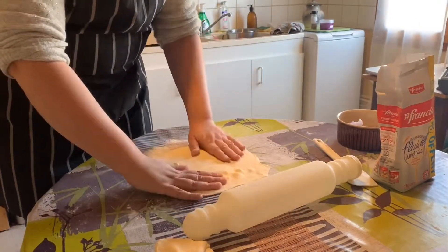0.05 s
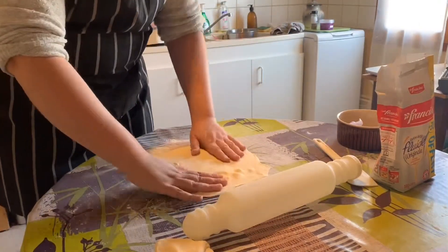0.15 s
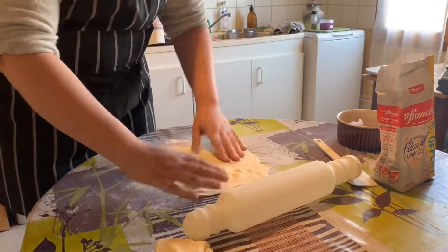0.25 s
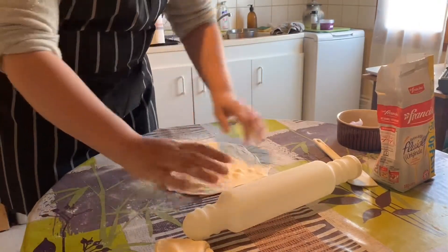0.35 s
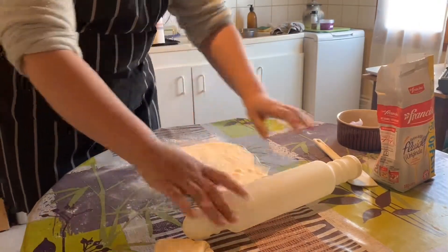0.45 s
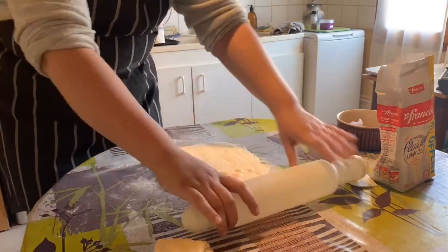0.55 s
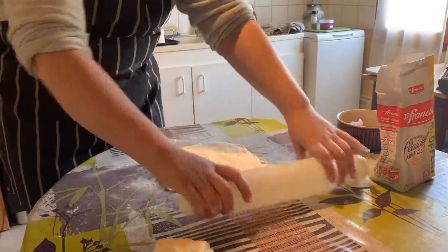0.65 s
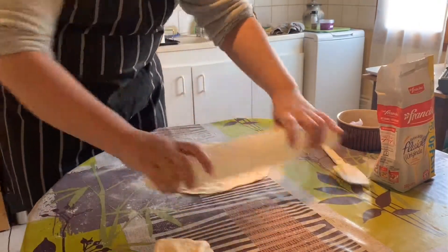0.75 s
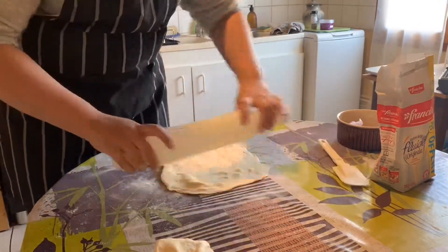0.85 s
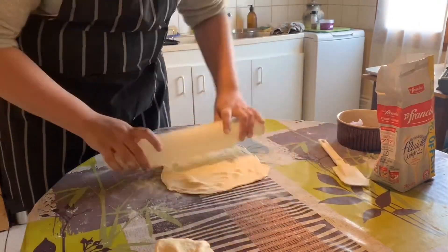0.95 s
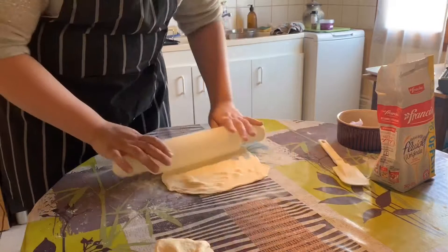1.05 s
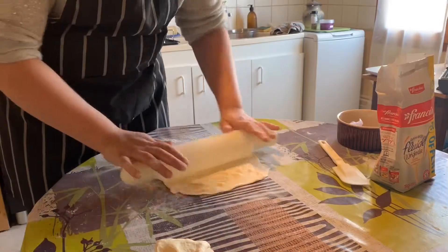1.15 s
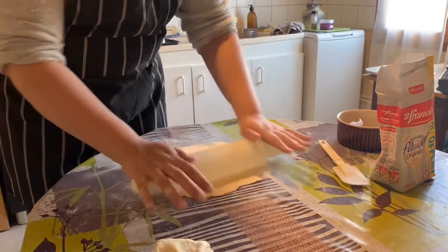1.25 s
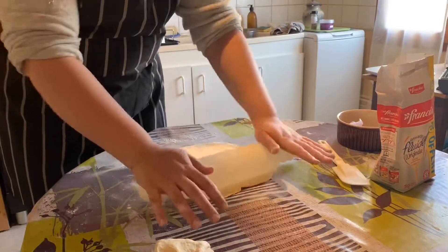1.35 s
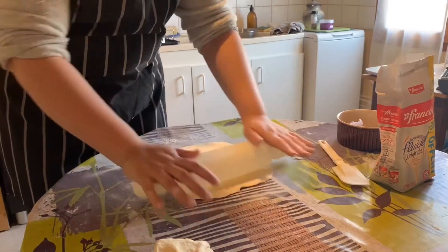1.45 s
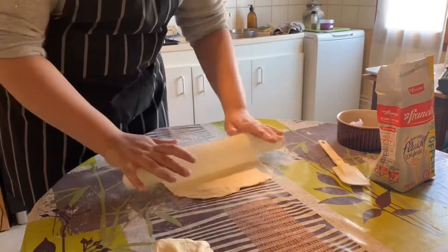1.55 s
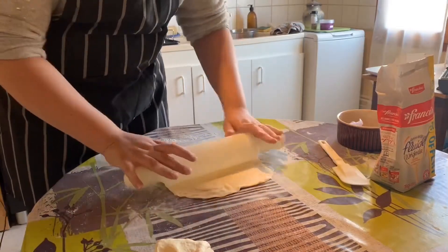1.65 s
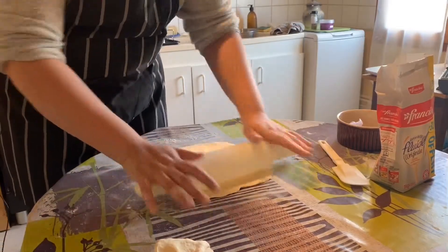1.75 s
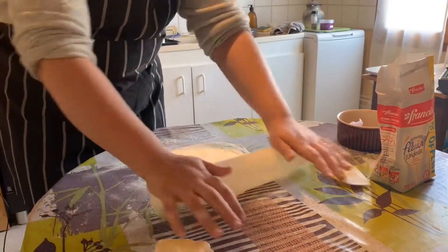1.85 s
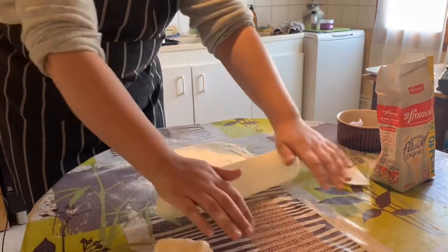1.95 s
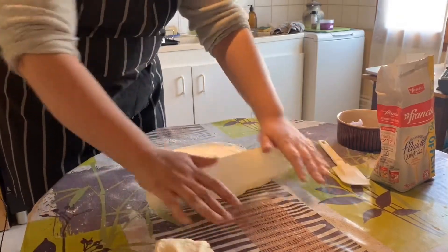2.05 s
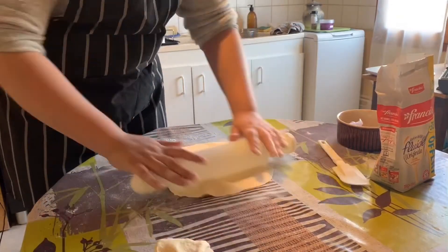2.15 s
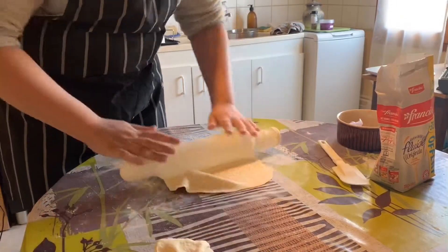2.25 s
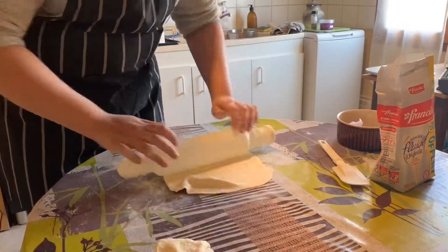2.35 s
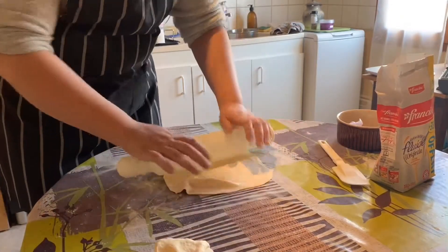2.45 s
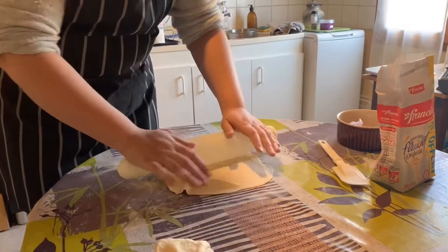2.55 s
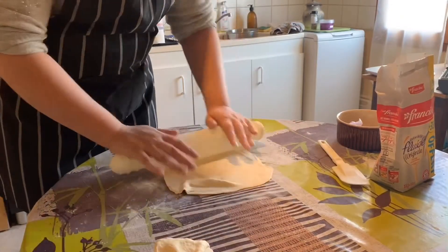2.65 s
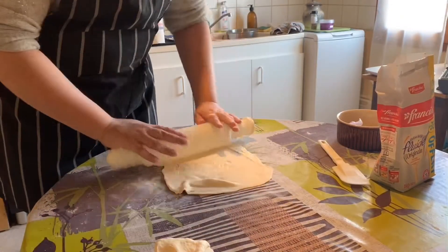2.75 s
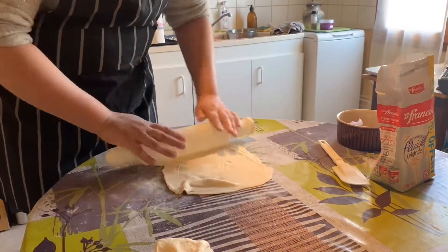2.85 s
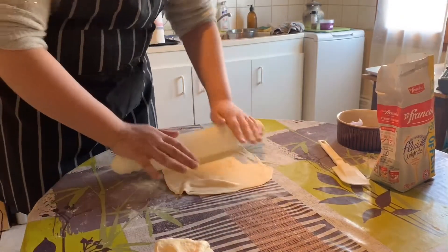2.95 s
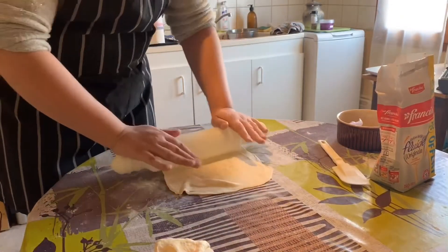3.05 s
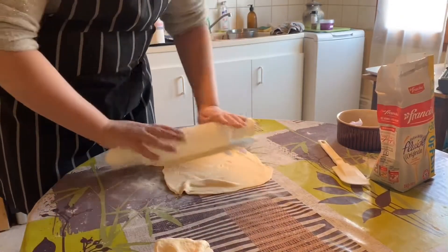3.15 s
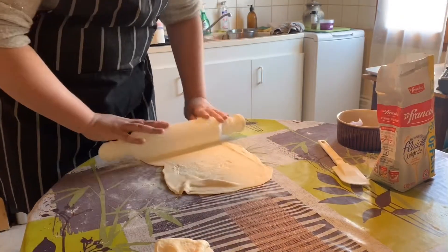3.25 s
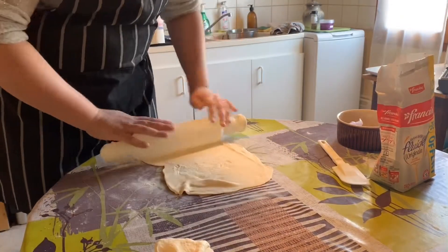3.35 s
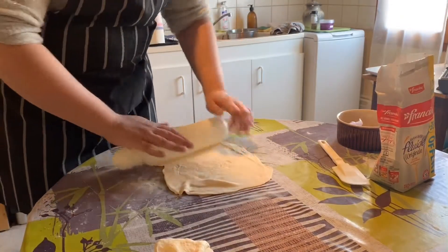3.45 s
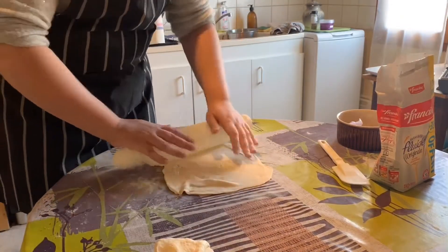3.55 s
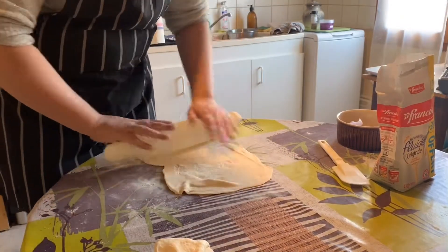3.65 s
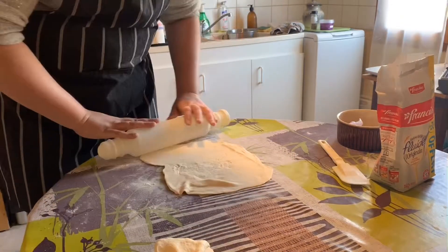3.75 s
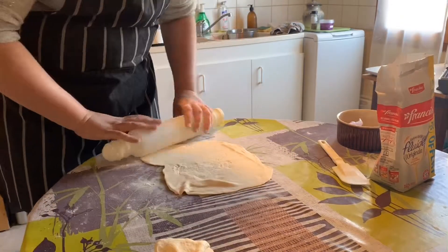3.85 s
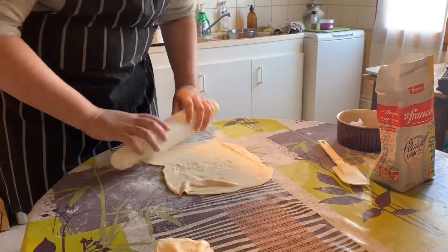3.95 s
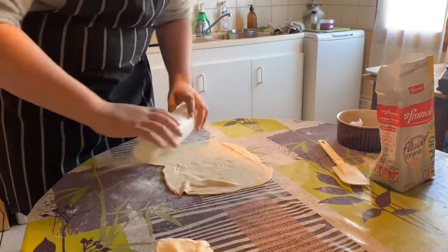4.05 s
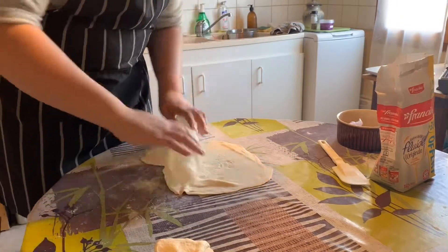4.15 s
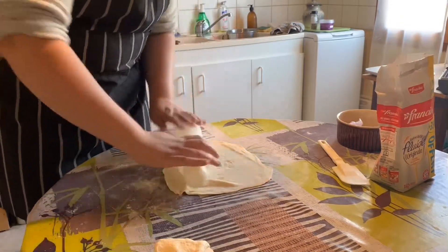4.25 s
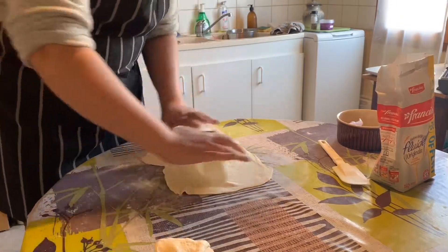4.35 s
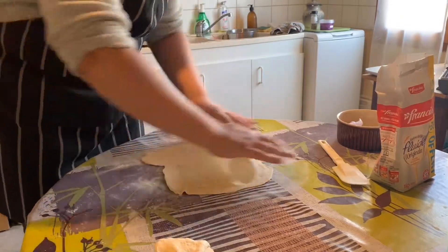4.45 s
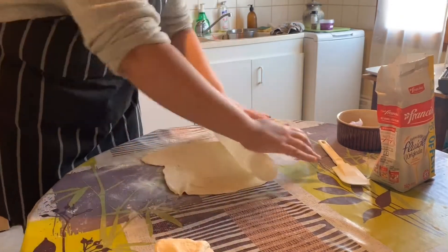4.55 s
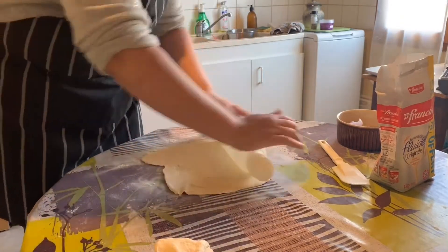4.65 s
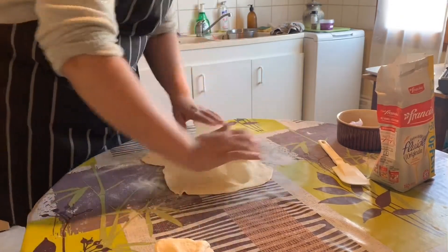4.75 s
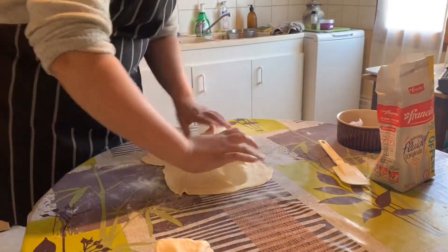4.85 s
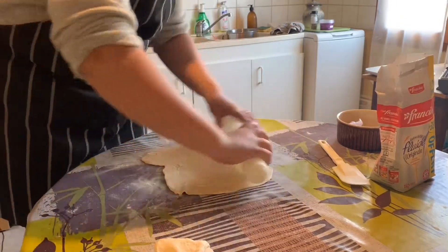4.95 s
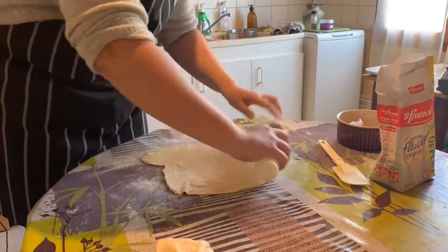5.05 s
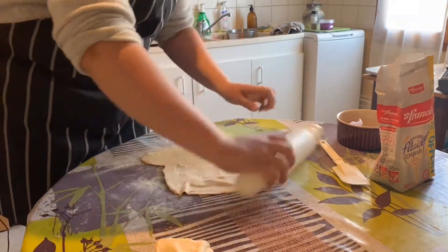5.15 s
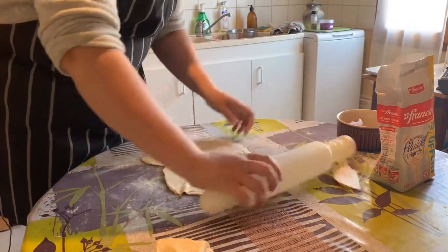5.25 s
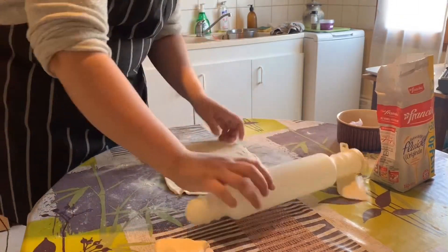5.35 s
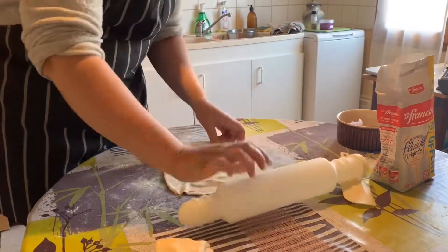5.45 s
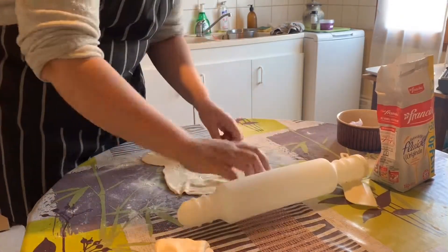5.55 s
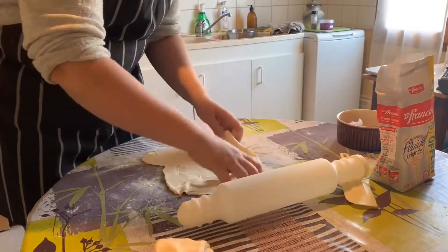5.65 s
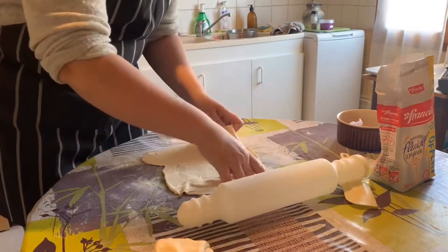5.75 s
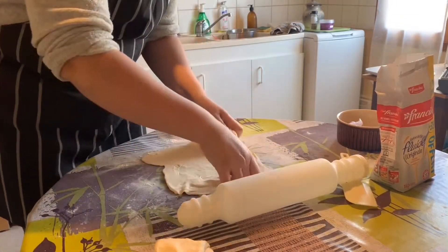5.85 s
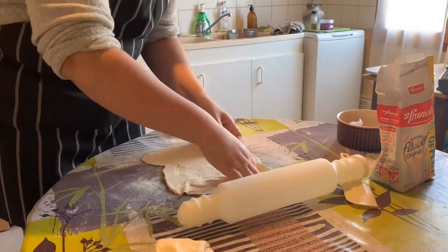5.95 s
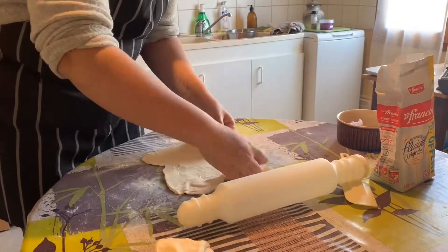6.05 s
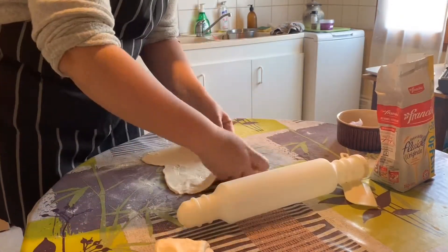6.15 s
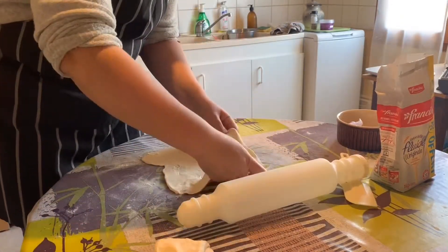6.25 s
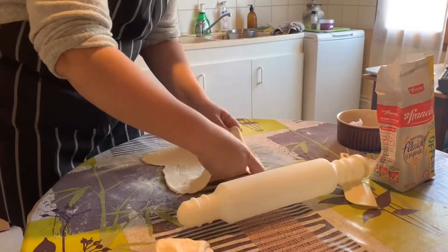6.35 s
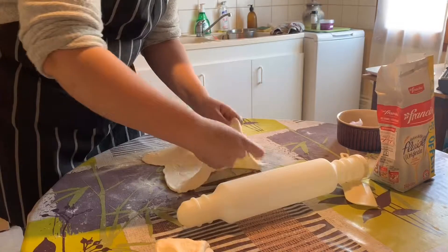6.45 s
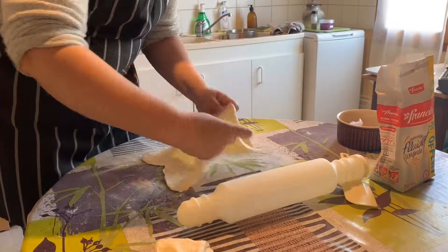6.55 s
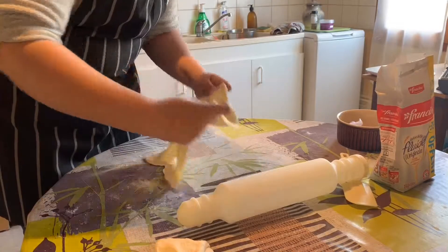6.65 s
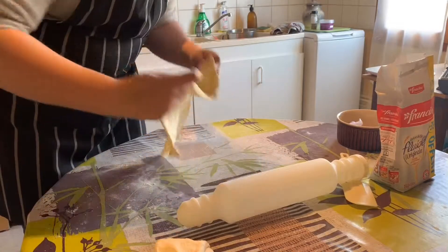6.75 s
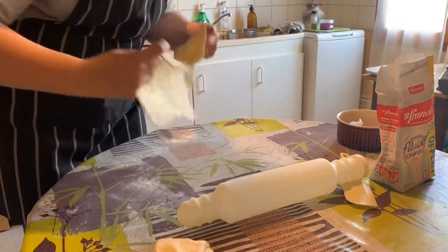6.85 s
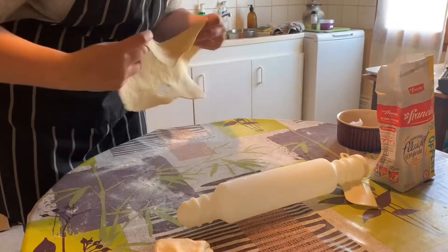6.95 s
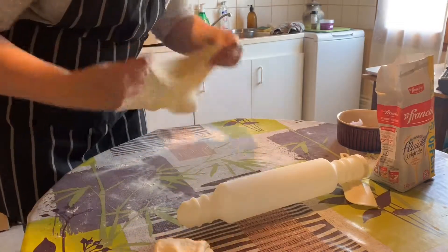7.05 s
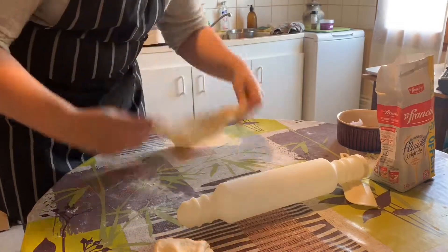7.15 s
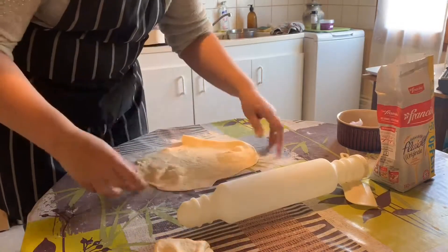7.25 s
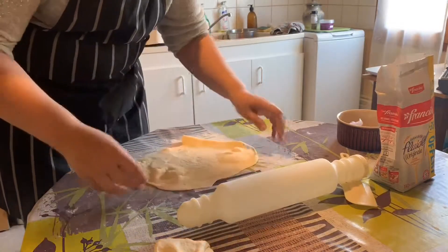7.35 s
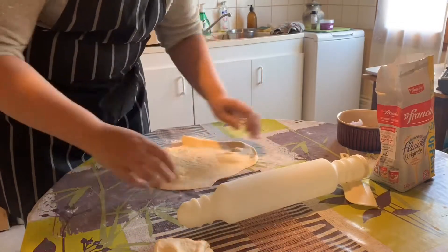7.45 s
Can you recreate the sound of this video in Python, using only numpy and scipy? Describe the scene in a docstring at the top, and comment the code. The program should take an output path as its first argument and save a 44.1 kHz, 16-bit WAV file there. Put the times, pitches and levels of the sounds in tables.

```python
"""Rolling out dough in a small kitchen

Dough is rolled out by hand on a floured oilcloth, heard close by; a faint appliance hums.
Palms brush dough and pin as noise that swells with the hand's speed; the pin rumbles as grainy noise.
Thumps, wood knocks, ticks and slaps are short decaying tones and noise; the pin clatters as it is laid aside.
The sheet is peeled off with a narrow hiss, turned over and slapped down; the room answers with a short tail."""
import sys
import numpy as np
from scipy import signal
from scipy.io import wavfile

SR = 44100
rng = np.random.default_rng(int(sys.argv[2]) if len(sys.argv) > 2 else 0)


def inscribe(sig):
    """Save sig as 16-bit PCM at rate SR to the path in sys.argv[1].

    A 1-D sig is mono; a 2-D sig holds one channel per row.
    Samples are clipped to [-1, 1] before scaling.
    """
    pcm = np.round(np.clip(np.atleast_2d(sig).T, -1, 1) * 32767)
    wavfile.write(sys.argv[1], SR, pcm.astype(np.int16))


N = 331191
TIME = np.arange(N) / SR
AGE = np.arange(SR // 2) / SR  # seconds since a blow

# Modes of the wooden rolling pin. Each row: frequency in Hz, level in dB, t60 in seconds.
PIN_MODES = [(532, -3.5, 0.036), (1032, -7, 0.037), (1715, -10, 0.075), (2583, -4, 0.039),
             (4270, -2.5, .03), (4820, -7.5, 0.055), (6600, -13.5, 0.025)]


def amp(db):
    """Decibels to gain."""
    return 10 ** (np.asarray(db) / 20)


def unit(x):
    """Scales to rms 1."""
    return x / np.sqrt(np.mean(x ** 2) + 1e-20)


def peaked(x, db):
    """Scales to a peak level in dB."""
    return amp(db) * x / abs(x).max()


def read(points, hz):
    """Reads a table on a log-frequency axis."""
    f, value = np.transpose(points)
    return np.interp(np.log(hz + 1), np.log(f), value)


def add(mix, s, sound):
    """Mixes a sound in at time s, in place."""
    part = mix[max(round(s * SR), 0):][:len(sound)]
    part += sound[:len(part)]


def colour(x, gain, size=8192):
    """Minimum-phase filter whose magnitude is gain(Hz)."""
    hz = abs(np.fft.fftfreq(size, 1 / SR)) + 1
    log_gain = np.log(np.maximum(gain(hz), 1e-5))
    response = np.exp(np.conj(signal.hilbert(log_gain)))
    taps = np.fft.ifft(response).real[:size // 2]
    return signal.oaconvolve(x, taps)[:len(x)]


def bump(f, centre, q):
    """Magnitude of one resonance."""
    return 1 / np.sqrt(1 + (q * (f / centre - centre / f)) ** 2)


def shaped(x, spectrum):
    """Gives x a spectrum, at rms 1."""
    return unit(colour(x, lambda f: amp(read(spectrum, f))))


def dying(t60):
    """Exponential decay by 60 dB in t60 seconds."""
    return np.exp(-np.log(1000) * AGE / t60)


def tone(hz):
    """A steady sine starting at the blow."""
    return np.sin(2 * np.pi * hz * AGE)


def ring(modes):
    """Impulse response of a struck body: a sum of decaying sines."""
    return sum(amp(db) * dying(t60) * tone(hz) for hz, db, t60 in modes)


def burst(t60):
    """A dying puff of noise: many small contacts or dense modes."""
    return rng.standard_normal(len(AGE)) * dying(t60)


def wander(per_s):
    """Random drift of rms 1 through per_s new values a second."""
    return unit(np.interp(TIME * per_s, np.arange(N), rng.standard_normal(N)))


def grains(per_s, spread_db):
    """Random tiny impacts of uneven size, at rms 1."""
    size = amp(spread_db * np.minimum(rng.exponential(1, N), 4))
    happens = rng.random(N) < per_s / SR
    return unit(size * rng.standard_normal(N) * happens)


def speed(fastest_s, rise_s, fall_s):
    """A hand speeds up, passes its top speed of 1 and slows down."""
    shape = 1.45  # roundness of the swell: 1 pointed, 2 a bell
    t = TIME - fastest_s
    distance = np.minimum(np.maximum(-t / rise_s, t / fall_s), 10)
    return np.exp(-distance ** shape)


def sustained(start_s, length_s, attack_s, release_s):
    """Linear attack, hold and an exponential release."""
    t = TIME - start_s
    attack = np.clip(t / attack_s, 0, 1)
    return attack * np.exp(-np.clip((t - length_s) / release_s, 0, 20))


def room_tone():
    """Still air as shaped noise, and a faint appliance hum whose phase wavers."""
    # Kitchen appliance. Each row: frequency in Hz, rms level in dB.
    hum_tones = [(592, -73), (1330, -87)]
    # Spectrum of the still room. Each row: frequency in Hz, relative level in dB.
    quiet_spectrum = [(25, -26), (42, -15.5), (60, 4.5), (110, -13), (200, -17), (400, -15), (620, -10),
                      (850, -24), (1400, -21), (3500, -20.5), (7000, -32.5), (14000, -34), (15800, -37.5)]
    quiet_db = -69
    hum = np.zeros(N)
    for hz, db in hum_tones:
        phase = 2 * np.pi * hz * TIME + 0.5 * wander(per_s=7.8)
        hum += amp(db) * unit(np.sin(phase))
    return hum + amp(quiet_db) * shaped(rng.standard_normal(N), quiet_spectrum)


def rubbing():
    """Micro-slips of skin on flour and cloth hiss and drag with the hand's speed; drag faintly rings the pin."""
    # Strokes of skin, sleeve and dough over pin and cloth. Each row: fastest moment in seconds,
    # speeding up in seconds, slowing down in seconds, bright hiss in dB, dull drag in dB.
    strokes = [(0.0, .02, 0.035, -61, -65), (.1, 0.018, 0.033, -76, -51), (.25, 0.14, 0.032, -74, -63),
               (.505, 0.0067, 0.048, -49.5, -52.5), (0.593, 0.04, 0.081, -41.5, -51),
               (.81, 0.055, 0.054, -50.5, -56), (1.022, 0.023, 0.032, -46.5, -50),
               (1.123, 0.049, 0.081, -46.5, -52), (1.37, 0.1, 0.044, -58, -57.5),
               (1.489, 0.02, 0.052, -56.5, -54.5), (1.59, 0.034, 0.045, -51.5, -57),
               (1.86, 0.13, 0.06, -60, -56.5), (1.995, 0.046, 0.03, -53.5, -57.5),
               (2.215, 0.059, 0.14, -52.5, -52), (2.375, 0.048, 0.036, -45, -52),
               (2.509, 0.013, 0.02, -56, -59), (2.75, 0.18, 0.077, -61, -59),
               (2.938, .02, 0.032, -56, -63.5), (3.03, 0.063, 0.057, -67, -62),
               (3.16, 0.028, 0.04, -54, -55), (3.238, 0.039, 0.056, -50.5, -53),
               (3.428, .026, 0.064, -48.5, -52.5), (3.76, 0.12, 0.096, -55, -54.5),
               (3.92, 0.081, 0.084, -45, -49), (4.104, 0.052, 0.12, -44.5, -55.5),
               (4.322, .06, 0.088, -48.5, -59), (4.49, 0.027, 0.036, -57, -57),
               (4.57, 0.03, .025, -51, -54.5), (4.784, 0.076, 0.055, -48.5, -53),
               (5.011, 0.095, 0.17, -44, -54.5), (5.15, 0.11, 0.31, -44, -53.5),
               (5.42, 0.055, 0.12, -47.5, -51), (5.639, 0.072, 0.13, -52.5, -58),
               (5.779, 0.047, 0.064, -53.5, -51), (6.08, 0.45, 0.062, -64.5, -63),
               (6.26, 0.06, 0.043, -74.5, -62.5), (6.599, 0.13, 0.14, -66.5, -60),
               (6.789, 0.063, 0.03, -63, -64.5), (6.93, 0.089, 0.1, -80.5, -67.5),
               (7.185, 0.013, .045, -74.5, -56), (7.294, 0.022, 0.051, -59, -38)]
    # Spectra of hiss and drag. Each row: frequency in Hz, relative level in dB.
    hiss_spectrum = [(1800, -35), (2900, -15), (3700, -9.5), (5000, -5.5), (7000, -5), (8500, -9),
                     (11000, -10.5), (14000, -10.5), (15800, -9.5)]
    drag_spectrum = [(450, 2), (800, -4), (1080, 1), (1400, 1.5), (1720, 1.5), (2100, -3), (2650, -1),
                     (3100, -3), (4000, -1), (5500, -6.5), (8000, -19.5), (16000, -29.5)]
    drag_exponent = 0.75  # drag grows as this power of the speed, so it outlasts the hiss
    hiss_power, drag_power = np.zeros((2, N))
    for s, rise_s, fall_s, hiss_db, drag_db in strokes:
        pace = speed(s, rise_s, fall_s)
        hiss_power += (amp(hiss_db) * pace) ** 2
        drag_power += (amp(drag_db) * pace ** drag_exponent) ** 2
    hiss = shaped(grains(per_s=18000, spread_db=-0.8), hiss_spectrum) * np.sqrt(hiss_power)

    slips = grains(per_s=4000, spread_db=-2.5)
    rung_pin = signal.oaconvolve(slips, ring(PIN_MODES))[:N]
    singing = unit(colour(rung_pin, lambda f: bump(f, 1500, q=0.99)))
    held = np.interp(TIME, [0.5, 0.6, 5.3, 5.45], [0, 1, 1, 0])  # the hands are on the pin
    dull = shaped(grains(per_s=4400, spread_db=-1.0), drag_spectrum)
    drag = (dull + amp(-6.5) * held * singing) * np.sqrt(drag_power)

    direct = (hiss + drag) * amp(wander(per_s=79))  # flickers by 1 dB rms
    # the bounce off the table top shifts as the hands move
    lag_s = 0.001115 + 0.0003 * wander(per_s=5)
    return direct + amp(-7) * np.interp(TIME - lag_s, TIME, direct)


def slaps():
    """Flat surfaces meet: the trapped air pops and a bright splash escapes at the rim."""
    # Flat pats of palm and dough. Each row: start in seconds, peak in dB, trapped air in Hz,
    # splash in dB relative to the pop.
    pats = [(.059, -38, 1090, -12), (.066, -34, 1515, 2), (.079, -32, 886, -9), (7.224, -38.5, 760, -2),
            (7.256, -21.5, 490, 7), (7.2639, -18.5, 710, 0), (7.271, -8, 785, -2)]
    out = np.zeros(N)
    for s, db, hz, splash_db in pats:
        air = ring([(hz * 0.86, -4, 0.045), (hz, -3, 0.03), (hz * 1.3, -2, 0.045)])
        pop = colour(air + amp(8.5) * burst(0.065), lambda f: bump(f, hz, q=1.46) ** 2)
        spray = burst(0.023) + amp(-12.0) * burst(0.23)
        splash = colour(spray, lambda f: bump(f, 2880, q=0.72))
        add(out, s, peaked(peaked(pop, 0) + peaked(splash, splash_db), db))
    return out


def thumps():
    """A padded blow sounds its spot and the whole top; longer contact swells slower and rings duller."""
    # Hands, pin and dough landing on the table top. Each row: start in seconds, peak in dB,
    # pitch favoured by the spot in Hz, contact time in ms, sag of the whole top in dB.
    blows = [(.064, -28.5, 230, 1.4, 23), (0.488, -26.5, 143, 3.65, -8), (0.626, -24, 227, 1.9, 2.5),
             (0.776, -31.5, 315, 3.7, 11), (0.926, -36.5, 250, 3.6, 8), (1.027, -18.5, 289, 2.15, 2),
             (1.032, -22, 126, 7.3, -6), (1.344, -45, 303, 1.7, 6), (1.589, -44, 345, 0.78, -20),
             (2.009, -47, 130, 3.8, -2), (2.728, -48, 352, 2.9, -20), (3.017, -44, 138, 1.7, 22),
             (3.597, -26, 160, 2, 26), (3.74, -21, 370, 0.28, -10.5), (4.2145, -6.5, 290, 1.43, -1.5),
             (4.782, -23, 290, 3.47, 0.5), (5.066, -15, 315, 0.65, -21.5), (5.182, -25.5, 344, 3.1, -11.5),
             (5.246, -15.5, 388, 1.7, 1), (5.292, -17, 428, 1.5, -1.5), (5.358, -19, 394, 1.3, 2.5),
             (5.648, -25, 441, 2, -5.5), (5.877, -38.5, 214, 1.6, 15), (6.016, -35, 432, 0.45, 2),
             (6.236, -40.5, 326, 1.8, 2), (7.253, -22.5, 334, 1.2, 10)]
    # Modes of the table top. Each row: frequency in Hz, level in dB, t60 in seconds.
    table_modes = [(58.2, -30.5, 0.45), (70, -19, 0.11), (79.5, -20.5, 0.28), (134.4, -14.5, 0.12),
                   (149, -23, 0.29), (193, -15.5, 0.18), (282, -11, 0.096), (308.7, -15, 0.08),
                   (329.6, -27.5, 0.22), (361, -32.5, 0.43), (428, -32, 0.34), (484, -26.5, 0.2),
                   (570.3, -17.5, 0.099), (594, -21.5, 0.37), (644.5, -21, 0.29), (740, -17, 0.2),
                   (890, -22.5, .12)]
    out, top = np.zeros(N), ring(table_modes)
    for s, db, hz, contact_ms, sag_db in blows:
        limit_hz = 1000 / contact_ms

        def force(f):
            favoured = bump(f, hz, q=1.9) + amp(sag_db) * bump(f, 62, q=1.3)
            return favoured / np.sqrt(1 + (f / limit_hz) ** 7)

        spot = amp(-18.0) * dying(0.075) * tone(hz)
        swell = 1 - np.exp(-AGE * limit_hz / 1.1)
        struck = (spot + top + amp(-19.5) * burst(0.072)) * swell
        add(out, s, peaked(colour(struck, force), db))
    return out


def ticks():
    """Tiny contacts, each a very short ring with a trace of noise at its pitch."""
    # Fingernails and small sticky snaps. Each row: start in seconds, peak in dB, pitch in Hz,
    # ring t60 in seconds.
    contacts = [(0.487, -32.5, 6600, 0.00063), (1.108, -28, 3540, .003), (1.345, -29.5, 7200, 0.002),
                (1.478, -32.5, 5840, 0.00042), (1.59, -22.5, 3830, 0.0048), (2.201, -27.5, 4500, 0.01),
                (3.738, -32.5, 11000, .002), (3.763, -30.5, 4170, 0.0052), (4.211, -17.5, 3000, 0.00086),
                (4.222, -14, 2740, 0.00097), (5.2883, -18, 4250, 0.0029), (5.7497, -17, 5100, 0.00081),
                (6.587, -33.5, 4200, 0.0076), (7.197, -40.5, 6500, 0.0021)]
    out = np.zeros(N)
    for s, db, hz, t60 in contacts:
        noise = colour(burst(0.02), lambda f: bump(f, hz, q=2.0))
        snap = ring([(hz, 0, t60)]) + amp(-10.0) * noise
        add(out, s, peaked(snap, db))
    return out


def knocks():
    """A hard contact sounds a short note set by where the wood is hit, the pin's own modes and a crack."""
    # Bare wood knocking. Each row: start in seconds, peak in dB, pitch in Hz,
    # sharp crack in dB relative to the body.
    hits = [(.76, -28.5, 680, -18), (0.767, -30, 1290, -6), (.80, -31, 534, -28), (0.915, -36, 600, -15),
            (1.343, -33, 1560, -19), (1.592, -28.5, 1550, -13), (1.771, -36.5, 1610, -20),
            (2.203, -24.5, 1120, -23), (2.57, -39, 1460, -9), (2.73, -34.5, 1020, -19),
            (3.142, -36, 1060, -4), (4.217, -16.5, 857, -21.5), (5.066, -14, 583, -16),
            (5.181, -28.5, 1050, -32), (5.211, -14.5, 1650, -4.5), (5.225, -19, 1690, -12),
            (5.24, -11, 990, -4), (5.266, -15.5, 780, -2.5), (5.2895, -13, 2535, -8.5),
            (5.354, -13, 1250, -34), (5.445, -27, 1100, -14), (5.65, -32, 805, -28), (5.709, -27, 710, -23)]
    out, wood = np.zeros(N), ring(PIN_MODES)
    for s, db, hz, crack_db in hits:
        note = amp(-4) * dying(0.016) * tone(hz)
        body = colour(note + amp(-12) * wood + burst(0.031), lambda f: bump(f, hz, q=0.71) ** 2)
        crack = colour(burst(0.0067), lambda f: bump(f, 4300, q=1.0))
        add(out, s, peaked(peaked(body, 0) + peaked(crack, crack_db), db))
    return out


def rolling():
    """The pin rides over creases, which drum on the table, and crumbs, which sound the wood."""
    # Pushes and pulls of the pin over the cloth. Each row: start in seconds, length in seconds,
    # rumble in dB, gritty crunch in dB.
    pushes = [(2.05, 0.14, -49, -59), (2.273, 0.12, -45.5, -54.5), (3.128, 0.21, -50.5, -59),
              (3.351, 0.058, -43.5, -56), (3.544, 0.071, -39, -49), (3.727, .11, -41, -47.5),
              (3.898, 0.1, -49, -50.5)]
    # Spectra of rumble and crunch. Each row: frequency in Hz, relative level in dB.
    rumble_spectrum = [(40, -30), (100, -9.5), (135, -7), (175, 4.5), (215, -5.5), (265, -2), (400, -13.5),
                       (620, -21.5), (1200, -46.5)]
    crunch_spectrum = [(200, -16.5), (350, 2), (620, 3), (900, -3), (1400, -7), (1720, 1.5), (2100, -16),
                       (2650, -8), (4000, -26), (8000, -54)]
    rumble = shaped(grains(per_s=2500, spread_db=3.0), rumble_spectrum)
    crunch = shaped(grains(per_s=790, spread_db=1.5), crunch_spectrum)
    out = np.zeros(N)
    for s, length_s, rumble_db, crunch_db in pushes:
        push = sustained(s, length_s, attack_s=0.014, release_s=0.043)
        out += push * (amp(rumble_db) * rumble + amp(crunch_db) * crunch)
    return out


def chatter():
    """The dropped pin chatters on the table: many tiny rebounds ring its modes and weaken until it lies still."""
    start_s, length_s, start_db, fall_db_per_s = 5.208, 0.21, -32, 67.5
    contact = amp(-17.5) * ring(PIN_MODES) + burst(0.014)
    rebounds = signal.oaconvolve(grains(per_s=690, spread_db=-5.0), contact)[:N]
    level = amp(start_db - fall_db_per_s * np.maximum(TIME - start_s, 0))
    level = level * sustained(start_s, length_s, attack_s=0.0025, release_s=0.027)
    return level * unit(colour(rebounds, lambda f: bump(f, 1950, q=0.66) ** 2))


def peeling():
    """Fine slips under the sheet gather in one narrow band, with a fainter fizz above it."""
    # Fingers working under the sheet. Each row: start in seconds, length in seconds, level in dB.
    peels = [(5.3, 0.78, -56.5), (6.55, 0.045, -56)]
    band_hz, fizz_hz, fizz_db = 4510, 11000, -10.5
    level = np.zeros(N)
    for s, length_s, db in peels:
        level += amp(db) * sustained(s, length_s, attack_s=0.06, release_s=0.03)
    slips = rng.standard_normal(N)
    band = unit(colour(slips, lambda f: bump(f, band_hz, q=8.5) ** 2))
    fizz = unit(colour(slips, lambda f: bump(f, fizz_hz, q=1.2) ** 2))
    return level * (band + amp(fizz_db) * fizz)


def kitchen(x, gap_s=0.0014, build_s=0.0081):
    """Dense reflections off tiles and cupboards, each band dying at its own speed."""
    # Decay of the room. Each row: frequency in Hz, t60 in seconds.
    room_t60 = [(60, 0.64), (250, 0.37), (700, 0.36), (2000, 0.29), (5000, 0.21), (14000, 0.091)]
    # Strength of the reflections. Each row: frequency in Hz, level in dB.
    strength = [(60, -7.5), (250, 2.5), (700, 3.0), (3000, -6.0), (14000, 0.5)]
    hz, t, bands = signal.stft(rng.standard_normal(len(AGE)), SR, nperseg=256)
    decay = np.exp(-np.log(1000) * t / read(room_t60, hz)[:, None])
    bands = bands * decay * amp(read(strength, hz))[:, None]
    tail = signal.istft(bands, SR, nperseg=256)[1][:len(AGE)]
    tail = tail * np.clip((AGE - gap_s) / build_s, 0, 1)
    return signal.fftconvolve(x, tail / np.linalg.norm(tail))[:N]


def scene():
    """All the work on the table, heard close by in the room."""
    low, wood, snaps, pats = thumps(), knocks() + chatter(), ticks(), slaps()
    sliding = rubbing() + rolling() + peeling()
    # each kind of sound excites the room by its own amount
    to_room = amp(-16) * low + amp(-7.5) * wood + amp(-4.0) * snaps
    to_room += amp(-13.5) * pats + amp(-10.5) * sliding
    return (low + wood + snaps + pats + sliding + kitchen(to_room) + room_tone())[None]


def record(dry):
    """The small microphone loses the deep bass; a steep low-pass then limits the band."""
    bass_hz, edge_hz = 50, 15950
    bass_cut = signal.butter(8, bass_hz, "highpass", fs=SR, output="sos")
    thin = signal.sosfilt(bass_cut, dry)
    band_limit = signal.firwin(511, edge_hz, window=("kaiser", 9), fs=SR)
    return signal.oaconvolve(thin, band_limit[None], "same")


dry = scene()
out = record(dry)
inscribe(out)
```